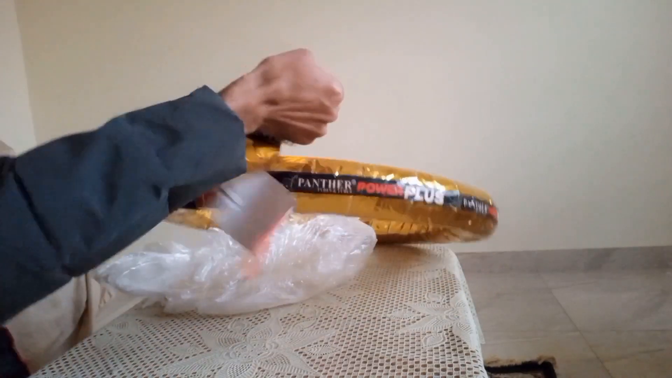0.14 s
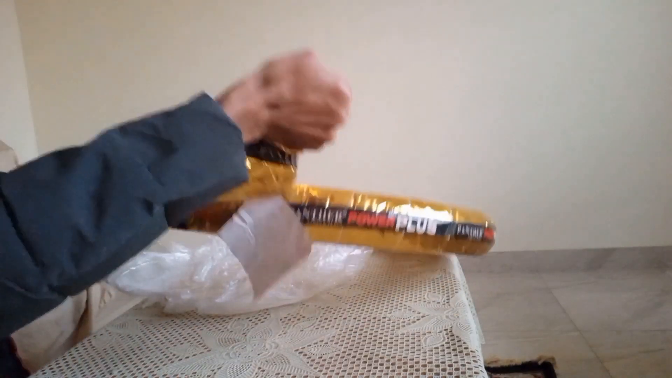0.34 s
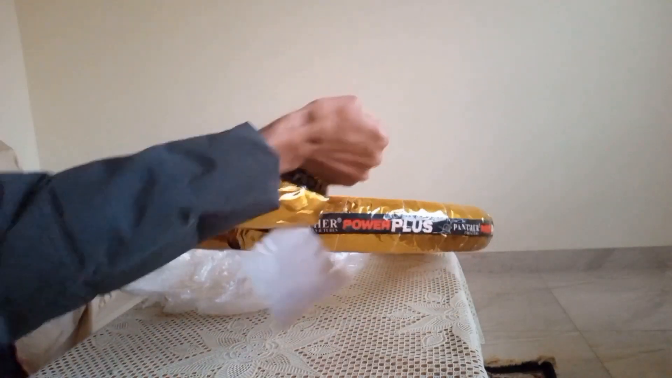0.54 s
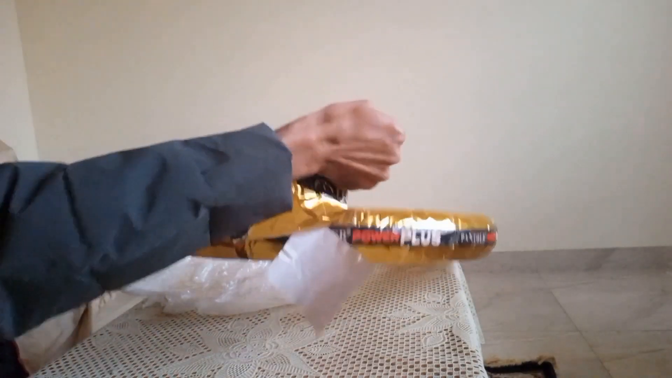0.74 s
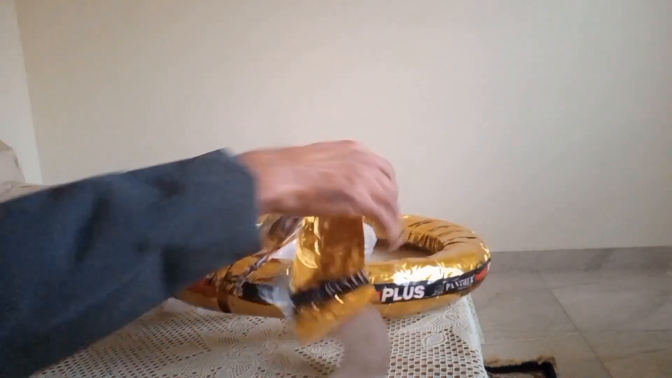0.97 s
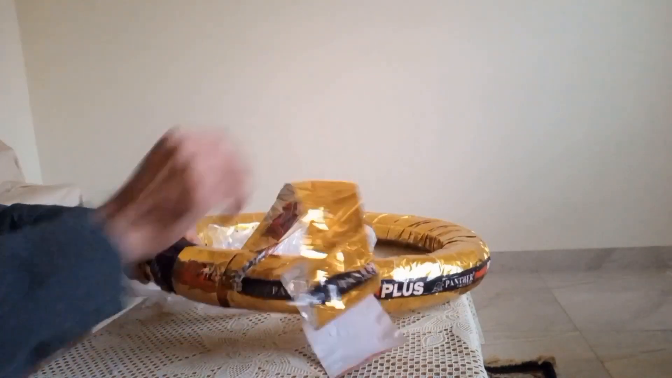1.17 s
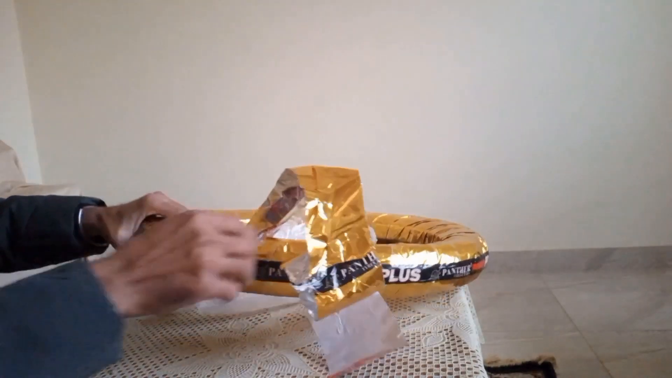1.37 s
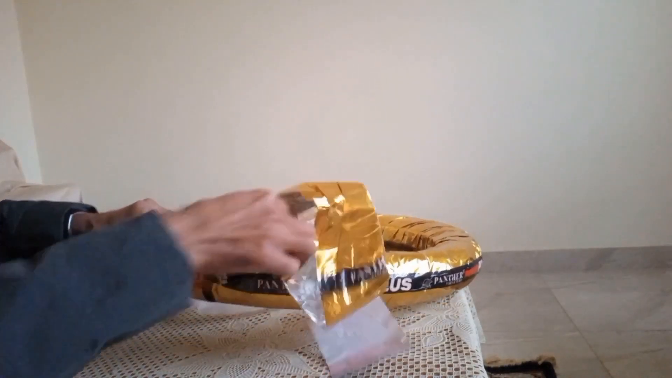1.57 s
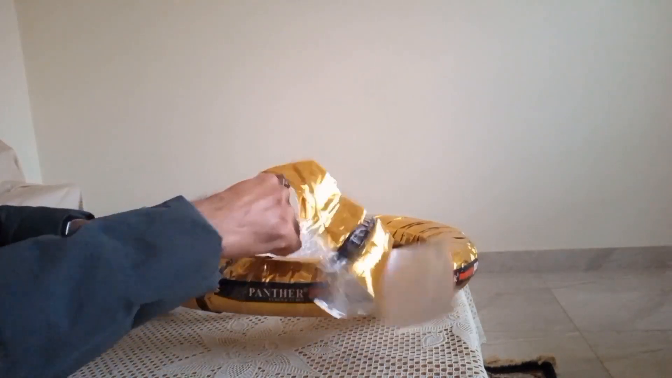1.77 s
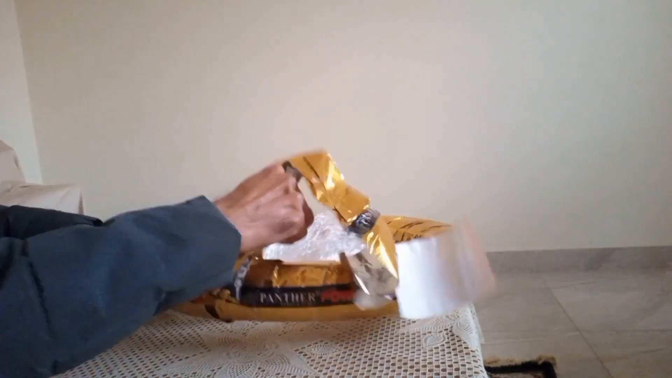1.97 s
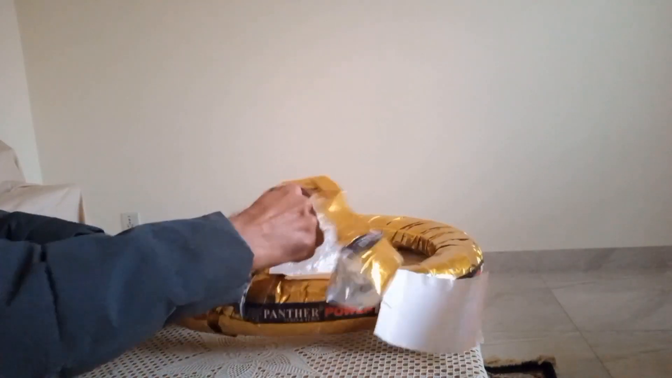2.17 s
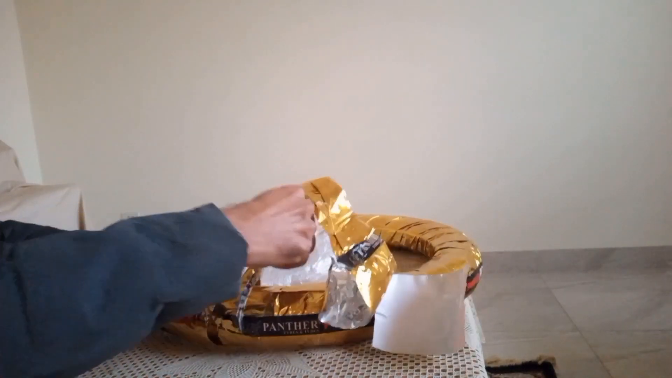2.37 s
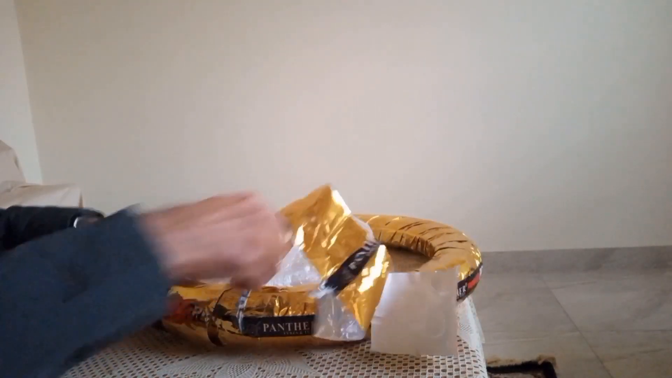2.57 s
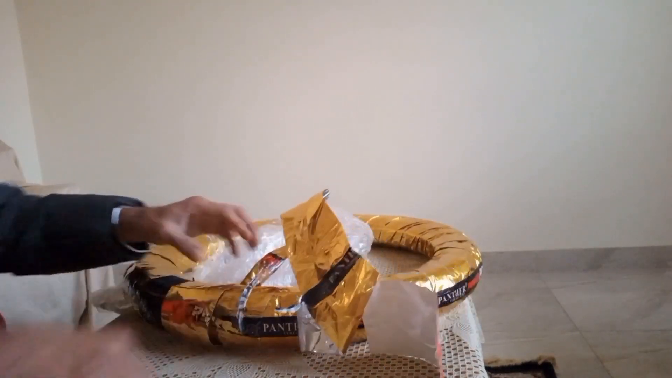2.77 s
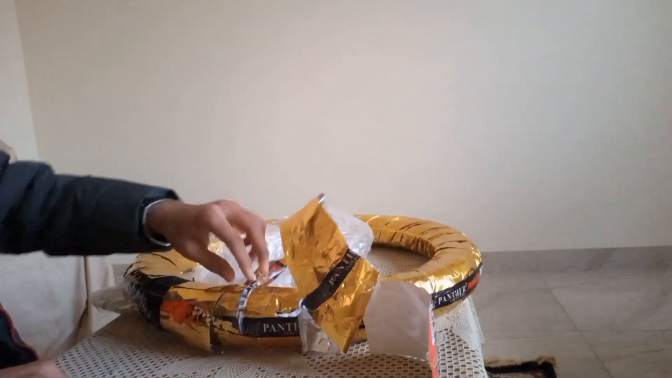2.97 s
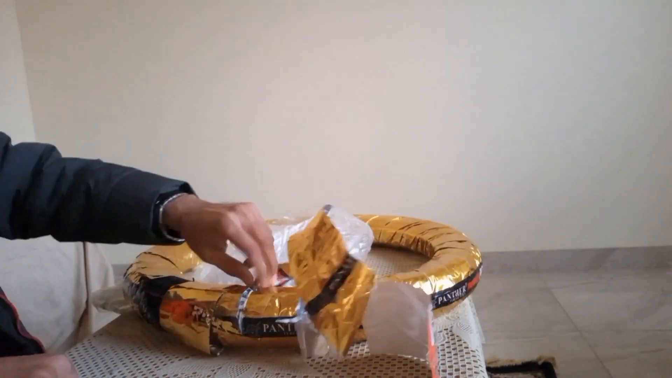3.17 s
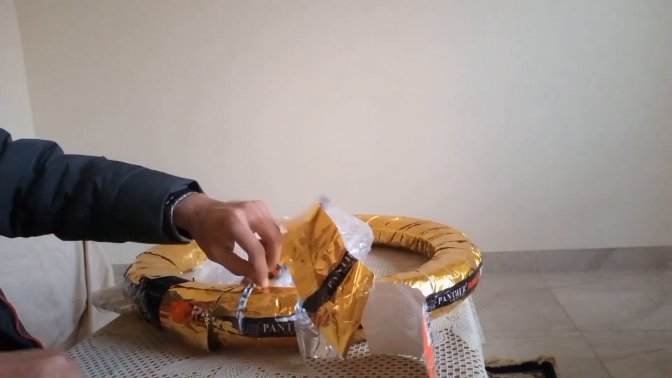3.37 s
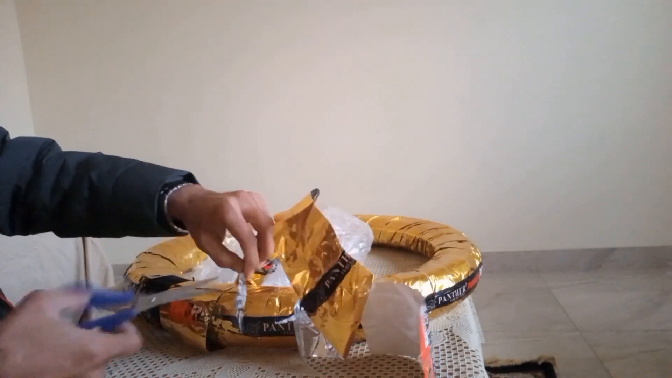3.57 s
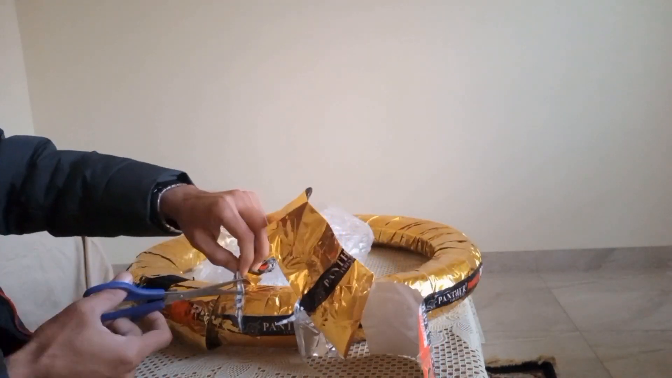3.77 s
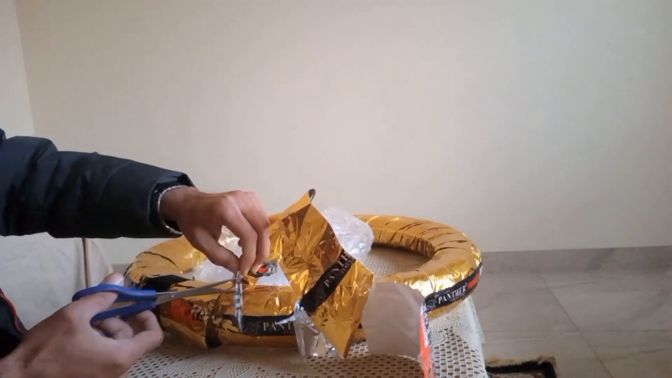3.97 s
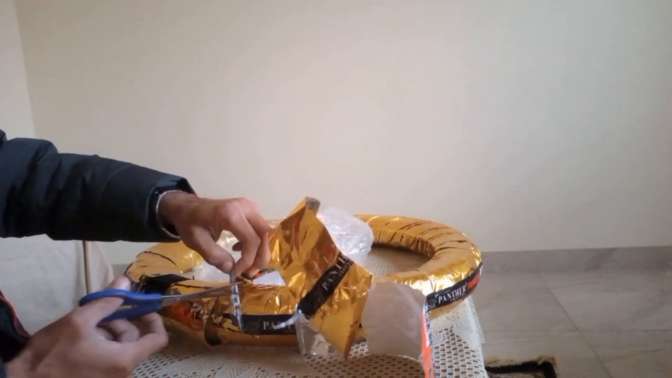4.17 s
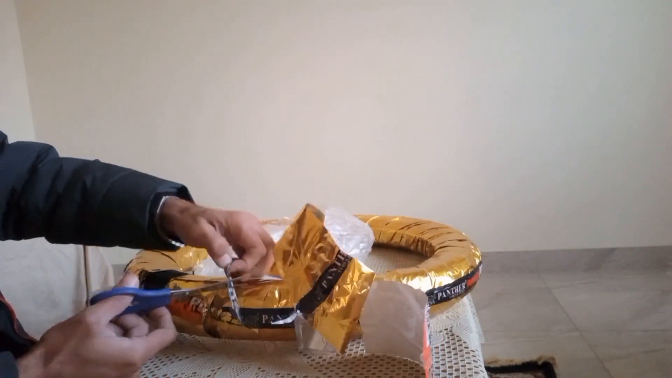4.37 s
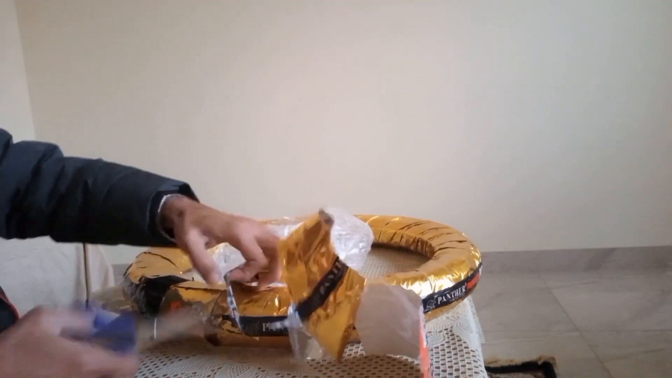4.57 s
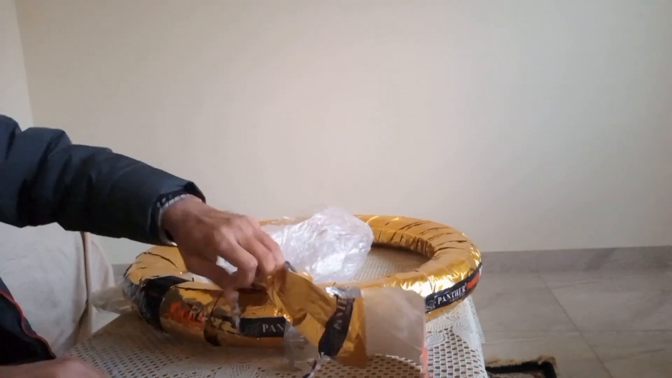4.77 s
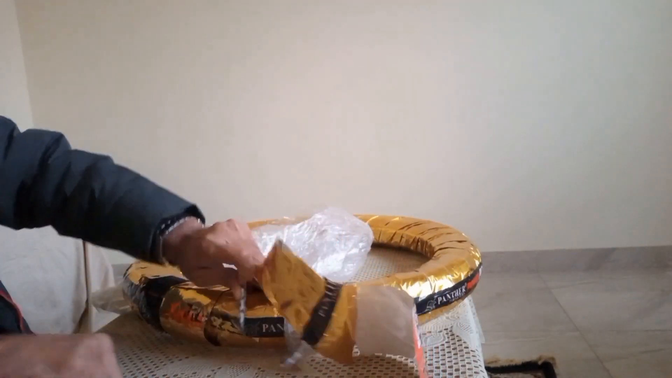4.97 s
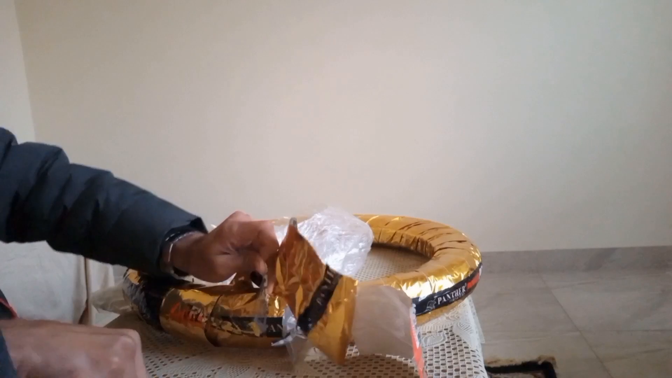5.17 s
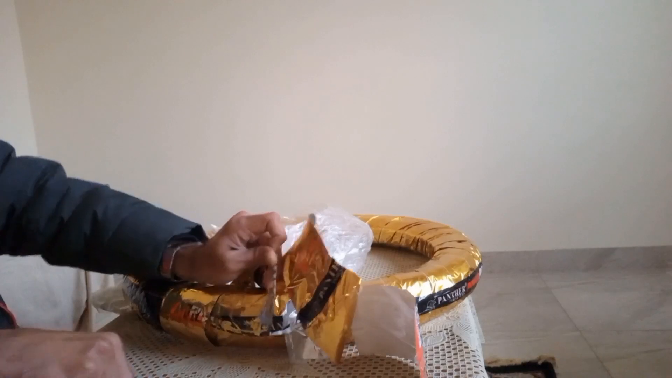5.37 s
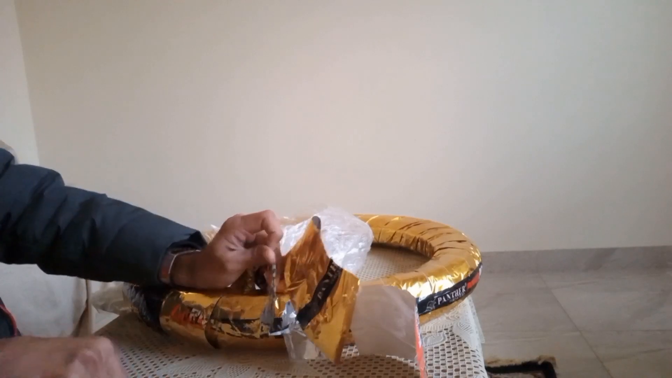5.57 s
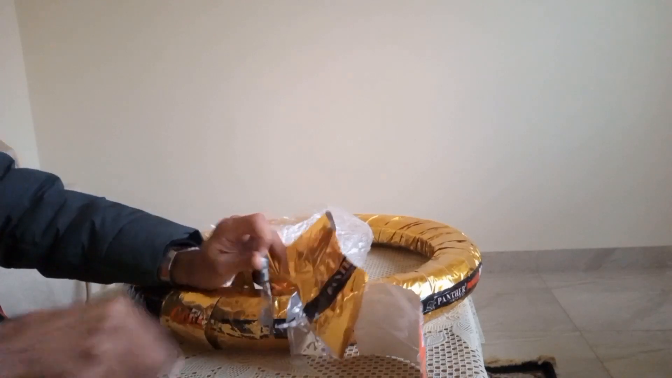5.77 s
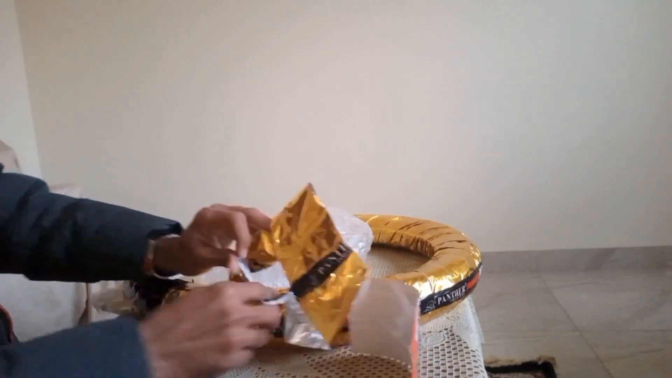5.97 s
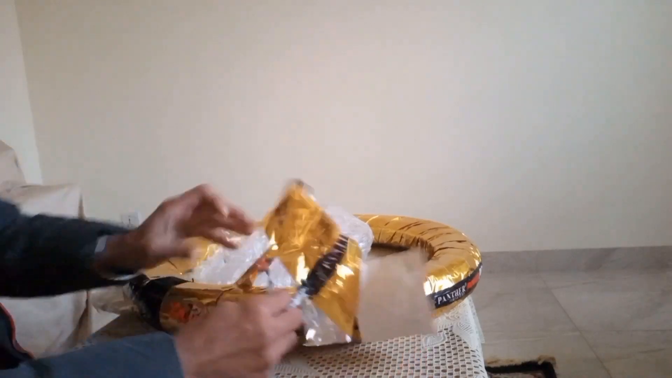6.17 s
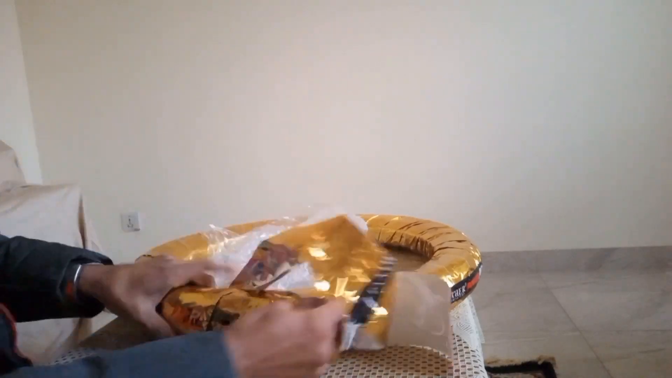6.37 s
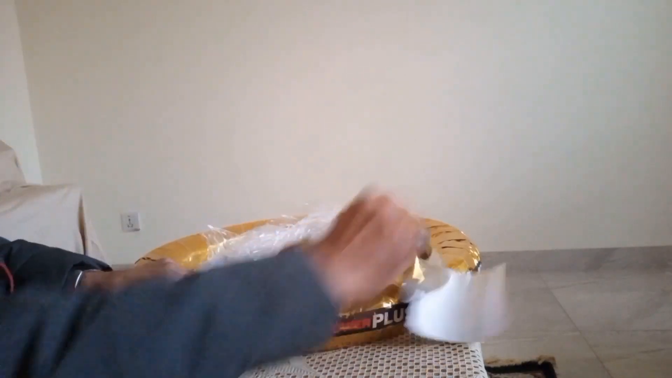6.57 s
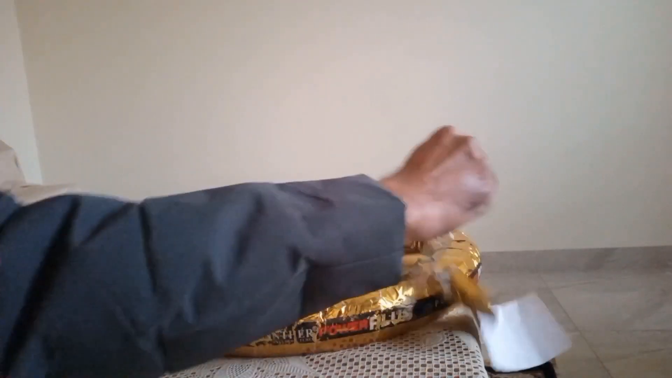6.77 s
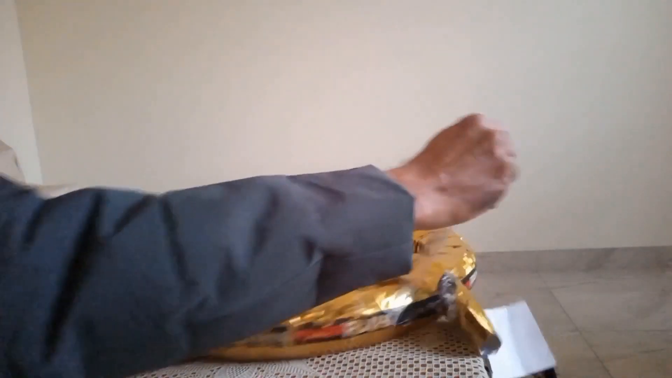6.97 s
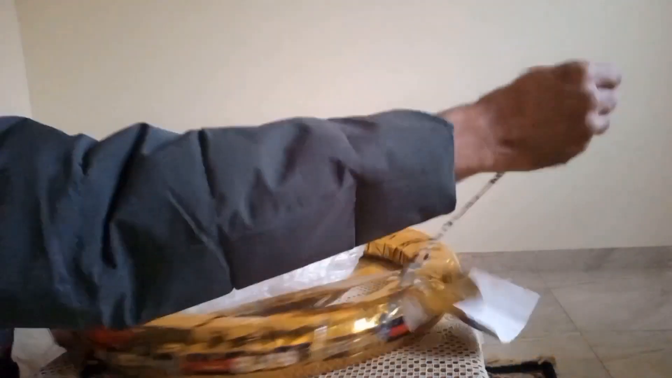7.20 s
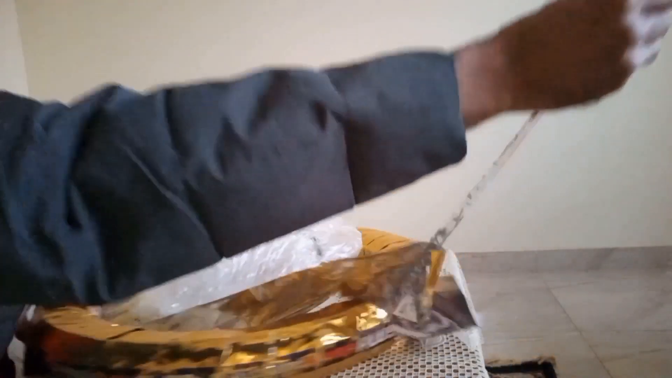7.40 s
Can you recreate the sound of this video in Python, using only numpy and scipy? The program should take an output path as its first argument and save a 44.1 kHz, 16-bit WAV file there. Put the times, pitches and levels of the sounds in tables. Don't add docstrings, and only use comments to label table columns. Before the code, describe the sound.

Metallic foil and plastic film crackle and snap off a tyre, quieting to small ticks, then ripping loudly in a bare tiled room.

```python
import sys
import numpy as np
from scipy import signal
from scipy.fft import rfft, irfft
from scipy.io import wavfile
from scipy.ndimage import uniform_filter1d

SR = 44100
rng = np.random.default_rng(int(sys.argv[2]) if len(sys.argv) > 2 else 0)


def wav_out(sig):
    wavfile.write(sys.argv[1], SR, np.round(np.clip(np.atleast_2d(sig).T, -1, 1) * 32767).astype(np.int16))


def ratio_of_db(decibels):
    return 10 ** (np.asarray(decibels, float) / 20)


N = 328104

# t/s, effort/dB, bright film share/dB, hollow tyre share/dB,
# tightness of the foil/dB
RUSTLE = [(0, -43, 1.5, -7, 4.5), (.3, -45, 0, 7, -0.5), (.7, -57, 1.5, -6, 1.5),
          (1.15, -48.5, 0.5, 5, 0.5), (1.46, -69.5, 1.5, -9, 6), (1.75, -51, -2.5, 2.5, -0.5),
          (2.3, -53.5, 0, 0.5, 0.5), (2.73, -72.5, -1.5, -0.5, 1.5), (3.0, -67, 1, 8.5, 3),
          (3.4, -70.5, 6, -3, 5), (3.75, -63, -2, 4, -3.5), (4.22, -83, -9, 2.5, 2.5),
          (4.33, -49, -4.5, 4, -2), (5.1, -53, 6, 8, 4), (5.6, -56, -1, -3, 2), (6.4, -53, -1.5, 6, 0),
          (6.75, -60, 7.5, -11.5, 4), (7.44, -40.5, 1, 7.5, 0.5)]
# t/s, length/s, effort/dB, thinness of the strip/dB
FOIL_RIPS = [
    (2.011, .14, -32, 0.7),
    (6.57, 0.015, -31, 1),
    (6.619, 0.081, -27.5, -5.5),
    (6.715, 0.055, -28, 2),
    (7.092, .13, -31, 1),
    (7.393, 0.046, -30.5, 4),
]


def crumpling():
    t = np.arange(N) / SR
    effort_db = effort(t)
    s, _, *shares = np.transpose(RUSTLE)
    bright_db, hollow_db, tight_db = (np.interp(t, s, share) for share in shares)
    thin_db = sum(db * ((t > s) & (t < s + length)) for s, length, _, db in FOIL_RIPS)
    bright_db = bright_db + thin_db
    hollow_db = hollow_db - 1.9 * thin_db

    coarse = creases(effort_db, per_s=1200, spread_db=3.5) * ratio_of_db(effort_db)
    fine = creases(effort_db, per_s=3500, spread_db=0) * ratio_of_db(effort_db) + coarse / 2
    slack = crackle(coarse * ratio_of_db(-4 - tight_db - thin_db), 1164, 2260, cycles=1.43)
    taut = crackle(fine * ratio_of_db(-7 + tight_db), 3020, 6270, cycles=2.14)
    film = crackle(fine * ratio_of_db(bright_db), 8260, 15600, cycles=0.97)
    tyre = crackle(coarse * ratio_of_db(hollow_db - 6), 266.6, 932, cycles=1.8)
    low_cut = signal.butter(2, 190, 'high', fs=SR, output='sos')
    return signal.sosfilt(low_cut, slack + taut + film + tyre)


def effort(t):
    # t/s, effort/dB, rise/s, fall/s
    grips = [(0, -25.5, .01, 0.11), (.192, -36.5, 0.15, 0.058), (.35, -29.5, 0.01, 0.13),
             (0.599, -43, 0.16, 0.17), (.771, -44, 0.07, 0.091), (1.055, -40, 0.15, 0.031),
             (1.74, -45, 0.15, 0.68), (1.905, -37, 0.031, 0.047), (2.16, -36.5, .02, 0.13),
             (2.4, -45, 0.05, 0.25), (2.506, -46, 0.16, 0.14), (3.07, -55.5, 0.01, 0.15),
             (3.335, -55, 0.03, 0.53), (3.578, -48.5, 0.011, 0.57), (4.752, -42, 0.14, 0.26),
             (5.175, -29.5, 0.0085, 0.039), (5.272, -38.5, 0.084, 0.057), (5.415, -42.5, 0.029, 0.33),
             (5.83, -41, 0.027, 0.037), (5.951, -45.5, 0.17, 0.021), (6.149, -49.5, 0.14, 0.093),
             (6.266, -38.5, 0.055, 0.026), (6.363, -43.5, 0.017, 0.2), (6.493, -35.5, 0.097, 0.035),
             (7.148, -27, 0.022, 0.021), (7.237, -30.5, .012, 0.019), (7.257, -28, 0.02, 0.055),
             (4.09, -60, 0.097, .02), (3.19, -57, 0.062, .03), (5.92, -47, 0.034, 0.026)]
    grip_range_db = 14
    rip_edge_db_per_s = 3000
    u = t[::32]
    parts = [np.interp(u, *np.transpose(RUSTLE)[:2])]
    for s, db, rise, fall in grips:
        parts.append(db - grip_range_db * np.maximum((s - u) / rise, (u - s) / fall))
    for s, length, db, _ in FOIL_RIPS:
        outside = np.maximum(np.maximum(s - u, u - s - length), 0)
        parts.append(db - rip_edge_db_per_s * outside)
    return np.interp(t, u, 10 * np.log10(sum(10 ** (p / 10) for p in parts)))


def creases(effort_db, per_s, spread_db):
    busy = np.clip(per_s * ratio_of_db(.55 * (effort_db + 40)), 120, 20000) / SR
    clump_db = 4 - 0.096 * np.maximum(effort_db + 49, 0)
    clump = ratio_of_db(clump_db * evened(uniform_filter1d(rng.standard_normal(N), 260)))
    spread = ratio_of_db(spread_db * np.minimum(rng.exponential(1, N), 3))
    size = clump * spread * (rng.random(N) < busy) / np.sqrt(busy)
    sign = rng.choice([-1., 1.], N)
    return size * sign / (uniform_filter1d(size ** 2, SR // 5) + 1e-3) ** .5


def crackle(clicks, lo_hz, hi_hz, cycles):
    count, out = 7, np.zeros((2, N))
    fold = evened(uniform_filter1d(rng.standard_normal(N), 900))
    which = (count * rng.random(N) / 2 + count * fold / 2).astype(int) % count
    for k, hz in enumerate(np.geomspace(lo_hz, hi_hz, count)):
        u = np.arange(round(4 * cycles * SR / hz) + 8) * hz / SR / cycles
        grain = np.pad(u * np.exp(-3 * u) * np.sin(2 * np.pi * cycles * u), (0, 8))
        pair = ports(grain / np.linalg.norm(grain), rng.integers(0, 5), rng.standard_normal(30))
        out += signal.oaconvolve((clicks * (which == k))[None], pair, axes=1)[:, :N]
    return out


def snaps():
    # t/s, peak
    # level/dB, ring f/Hz, treble against the ring/dB
    creasing = [(0.052, -11.5, 5800, -13), (0.1966, -13, 5000, -19.5), (0.3408, -22, 3070, -21),
                (0.3489, -13, 3260, -14), (0.3752, -13.5, 3280, -18), (0.4731, -28.5, 1890, -30),
                (0.572, -22.5, 4170, -2), (0.749, -18.5, 5740, -4), (0.9053, -28.5, 2540, -7),
                (1.1332, -25.5, 2750, -18), (1.2989, -34, 1330, -12), (1.412, -33, 2330, -39),
                (1.6297, -41, 2920, -20), (1.7372, -22, 2370, -21.5), (1.7902, -22.5, 4020, -10),
                (1.8611, -29, 2425, -26), (1.9104, -23, 3300, -26), (1.9192, -16, 4500, -11),
                (1.9312, -18.5, 1230, -21), (2.0057, -12.5, 2260, -12), (2.012, -20, 3020, -15),
                (2.1165, -11, 3280, -14), (2.3865, -30, 1750, -9), (2.5064, -27, 1560, -12),
                (2.595, -26.5, 3480, -21), (2.6071, -20, 3470, -5.5),
                (3.066, -39, 4300, -8), (3.135, -26.5, 5600, -14), (3.1907, -30, 5870, -10),
                (3.2928, -33, 3200, -6), (3.3398, -32.5, 6910, -8), (3.414, -34, 3100, -5),
                (3.4787, -21.5, 5700, -9), (3.5317, -29, 5730, -17), (3.5644, -28.5, 2850, -21),
                (3.575, -27, 1820, -15), (3.5846, -22, 5100, -13), (3.6177, -22, 3500, -8),
                (3.643, -18.5, 4900, 6), (3.7382, -29, 5600, -11), (3.7615, -25, 1590, -13),
                (4.007, -27, 4400, -9), (4.0973, -40.5, 4450, -14), (4.2497, -21, 4600, -11),
                (4.3225, -25.5, 2900, -16.5), (4.3436, -24, 6460, -17), (4.3865, -23, 4000, -16),
                (4.408, -24.5, 3870, -4), (4.4432, -26, 1170, -8), (4.4528, -27, 3500, -17),
                (4.5289, -25, 5090, -13), (4.5766, -22, 4600, -10), (4.6273, -23.5, 3500, -24)]
    picking = [(4.6985, -28, 3410, -7), (4.72, -16.5, 3670, -18), (4.7438, -18.5, 3390, -9),
               (4.853, -24, 3270, -15), (4.9428, -22, 3220, -2), (5.0112, -22, 3350, -5),
               (5.1751, -5.5, 1230, -2), (5.1872, -17.5, 1280, -7), (5.2038, -15.5, 3570, -11),
               (5.2096, -10, 1270, 1), (5.2455, -14, 1180, 1), (5.4761, -24, 3360, -12),
               (5.742, -23.5, 3350, -3), (5.812, -30, 4660, 3), (5.8235, -27, 3400, -20),
               (5.8322, -28, 3160, -8), (5.8797, -26, 5390, -1), (5.894, -27.5, 3500, -14),
               (5.95, -25, 1480, 2), (5.9564, -32, 3210, -10), (6.0353, -24, 3100, -27),
               (6.1355, -28, 5180, -8), (6.1585, -23, 6000, -8), (6.163, -27, 6100, -12)]
    tearing = [(6.417, -16, 4460, -10), (6.4898, -13, 1600, -8), (6.6169, -5, 2860, -10),
               (6.6293, -8, 2760, -6), (6.6356, -10, 3550, -13), (6.6424, -14, 4760, -23),
               (6.7659, -5.5, 5500, -15), (6.9986, -31.5, 6250, 3), (7.4054, -21, 4600, -18)]
    crunches = [(1.0442, -30, 2870, -13), (1.142, -28, 4460, 4), (2.022, -18.5, 2900, -21),
                (2.1297, -12.5, 3120, -12.5), (2.1446, -16.5, 3630, -4), (3.101, -39, 6870, -20),
                (3.7099, -20, 4860, -10), (3.8155, -31.5, 3070, -14), (3.832, -34.5, 5910, -8),
                (4.331, -37, 5180, -19), (4.831, -26.5, 1440, -14), (5.7062, -29, 5600, -13),
                (6.2737, -20, 6340, -9.5), (6.482, -13, 6660, -3), (6.5007, -12.5, 1450, -6),
                (7.0974, -19, 4800, -3), (7.352, -13, 1960, 0)]
    # t/s, peak level/dB,
    # ring f/Hz, treble against the ring/dB, length/ms
    folds = [(.0125, -7, 4800, -15, 2.2), (0.0149, -4.5, 5040, -11, 2.2), (0.019, -11, 4500, -12, 2),
             (.028, -11, 4160, -15, 3), (.083, -15.5, 5000, -12, 4), (0.3564, -6.5, 3200, -18, 3.5),
             (.361, -9, 2200, -17, 3.5), (0.7498, -25, 1050, -3, 3.5), (1.837, -31, 2500, -20, 2.5),
             (1.845, -19.5, 2560, -15, 2.8), (2.04, -19.5, 1090, -17, 4.5), (4.2677, -41, 3490, -16, 4),
             (4.2921, -38, 3100, -11, 4), (4.3635, -27, 1700, -11, 2.4), (4.4893, -36, 4200, -17, 2.5),
             (4.5974, -33, 3720, -13, 2.5), (4.6693, -29, 3130, -14, 2.2), (4.682, -33, 3300, -14, 2.5),
             (4.8222, -30, 3100, -14, 2.5), (4.9928, -28, 4640, -12, 2.2), (5.119, -17, 3360, -13, 1.9),
             (5.638, -19, 7000, -2, .8), (5.8681, -31, 3340, -5, 2.5), (5.917, -30, 4580, -14, 2.48),
             (6.0547, -36, 4870, -10, 4.5), (6.115, -31, 7410, -13, 4.6), (6.1272, -28, 2910, -10, 2.5),
             (6.213, -30, 3150, -13, 2.8), (6.247, -26.5, 4310, -10, 6), (6.27, -21, 5500, -12, 1.3),
             (6.289, -29, 7160, -14, 2.5), (6.408, -26, 2800, -18, 2), (3.593, -27, 1200, -12, 3),
             (3.64, -26, 900, -12, 3), (5.477, -24, 1250, -20, 3),
             (6.558, -5.5, 3420, -11, 1.6), (6.56, -9, 3300, -13, 2.2), (6.5684, -8.5, 3180, -6, 2.1),
              (6.5714, -8, 3300, -4, 3.1), (6.6453, -11, 4760, -10, 2.2), (6.7144, -17, 5500, -9, 5),
              (6.7275, -10, 6170, -12, 2.8), (6.733, -7, 5440, -11, 1.1), (7.1462, -13, 1790, -15, 3.4),
              (7.235, -15, 7390, -11, 5.9), (7.2553, -14.5, 9000, -7, 2.5), (7.2977, -13, 990, -7, 3),
              (7.3122, -12, 7170, -8, 2.8), (7.36, -19, 1700, -6, 2.5), (7.3953, -17, 5780, -10, 5.6),
              (7.4234, -14, 4570, -8, 2.1), (6.4835, -12, 3000, -8, 2), (7.272, -16, 900, -12, 4),
              (7.205, -16, 2000, -10, 5)]
    # events, length/ms, ring bandwidth as a share of its f
    kinds = [(creasing, 2, .7), (picking, 2, .37), (tearing, .48, .7), (crunches, 9.3, .7)]
    rows = [(*row, ms, wide) for table, ms, wide in kinds for row in table]
    rows += [(*row, .57) for row in folds]

    out, sent, t = np.zeros((2, N)), np.zeros(N), np.arange(-150, 650) / SR
    late = .0008
    swell = np.exp(np.minimum(t - .0004, 0) / .0004) + .1 * np.exp(np.minimum(t, 0) / .0015)
    click = (np.arange(800) == 150) * 1.
    flip = 2.7 * np.roll(click, 18)
    for s, db, hz, bright_db, ms, wide in rows:
        shape = swell * np.exp(-(np.maximum(t, 0) / (0.00088 * ms)) ** 2)
        low, high = (rng.standard_normal((2, 800)) + flip) * shape
        snap = crease_modes(low, high, hz, wide * hz, bright_db)
        snap = snap + 0.093 * np.roll(snap, round(0.0026 * SR))
        lag = int(np.clip(2 + 1.6 * rng.standard_normal(), 0, 5))
        pair = ports(snap, lag, rng.standard_normal(30))
        gain = ratio_of_db(db + 1) / abs(pair.mean(0)).max()
        add(out, s + late + t[0], gain * pair)
        add(sent, s + late + t[0], gain * crease_modes(click, click, hz, wide * hz, bright_db))
    return out, sent


def crease_modes(low, high, hz, width, bright_db):
    ring = evened(np.gradient(resonate_twice(low, hz, width, hz, width)))
    body = evened(resonate_twice(low, 850, 1100, 920, 1100))
    edge = evened(resonate_twice(high, 10700, 10500, 11400, 10900))
    return ring + (800 / hz) ** 1.2 * body + ratio_of_db(bright_db + 15) * edge


def tape():
    # t/s, length/s, slips per s at start, at end, level/dB
    pulls = [
        (5.397, 0.063, 820, 850, -31.5),
        (5.464, 0.052, 980, 1430, -28.5),
        (5.517, 0.069, 430, 197, -34),
        (5.575, .017, 220, 500, -31.5),
        (5.593, .04, 800, 1080, -28),
    ]
    # f/Hz, bandwidth/Hz, level/dB
    strip_modes = [(3240, 2900, 4.5), (7640, 1170, 14.5), (9500, 2830, 15.5), (13600, 4200, 13.5)]
    edge_db_per_s, slack_db = 1400, -43
    starts, lengths, first, last, _ = np.transpose(pulls)
    t = np.arange(starts[0] - .005, starts[-1] + lengths[-1] + 0.0022, 1 / SR)
    rate = np.interp(t, np.c_[starts, starts + lengths].ravel(), np.c_[first, last].ravel())
    levels = []
    for s, length, _, _, level_db in pulls:
        outside = np.maximum(abs(t - s - length / 2) - length / 3, 0)
        levels.append(level_db - edge_db_per_s * outside)
    db = np.maximum(np.max(levels, 0), slack_db)
    uneven = np.interp(t, [5.46, 5.48, 5.51, 5.52, 5.59, 5.6], [1.2, .3, .3, .04, .04, .3])
    jitter = 1 + uneven * evened(uniform_filter1d(rng.standard_normal(len(t)), 40))
    slips = np.diff(np.floor(np.cumsum(rate * abs(jitter)) / SR), prepend=0)
    slips = slips * ratio_of_db((-2 + 2 * uneven) * rng.standard_normal(len(t))) / np.sqrt(rate)
    modes = [(-1) ** k * ratio_of_db(g) * resonate(slips, f, w) for k, (f, w, g) in enumerate(strip_modes)]
    out = np.zeros((2, N))
    add(out, t[0], ports(evened(sum(modes)) * ratio_of_db(db), 0, rng.standard_normal(30)))
    return out


def thuds():
    # t/s, peak level/dB, f/Hz, decay/s
    knocks = [(0.35, -41, 550, 0.082), (1.904, -42.5, 550, 0.019), (2.92, -51, 270, 0.06),
              (2.905, -51, 680, 0.023), (0.038, -45.5, 314, 0.22), (1.298, -54, 500, 0.0095),
              (1.55, -58, 274, .06), (4.624, -45.5, 296, 0.025), (4.759, -42, 540, 0.024),
              (5.013, -48.5, 533, 0.02), (5.28, -44, 250, 0.08), (5.5, -55, 260, 0.072),
              (5.823, -46, 587, .03), (5.942, -46.5, 530, 0.025), (6.366, -45, 460, 0.01),
              (6.635, -34, 760, 0.017), (6.675, -34.5, 690, 0.022), (7.11, -38, 720, .04),
              (7.29, -35, 870, .015), (4.705, -53, 282, 0.029), (5.18, -35.5, 276, 0.048),
              (6.553, -32, 550, 0.018), (6.722, -53, 55, 0.035), (7.085, -41.5, 490, 0.02),
              (7.245, -36, 503, 0.037), (7.2, -51, 66, 0.08), (5.4, -50, 130, 0.067), (4.9, -53, 170, .15),
              (3.2, -59, 120, 0.13), (5.55, -66, 70, .1), (4.44, -58, 115, 0.037), (7.349, -34, 200, 0.014)]
    out, t = np.zeros((2, N)), np.arange(8000) / SR
    for s, db, hz, decay in knocks:
        push = rng.standard_normal(8000) * np.minimum(t / 0.01, 1) * np.exp(-t / decay) * (1 - t / t[-1])
        knock = resonate(push, hz, 0.28 * hz) + 0.055 * resonate(push, 2 * hz, hz)
        tilt_db = np.array([[1], [-1]]) * 350 / hz
        add(out, s, ratio_of_db(db + 13 + tilt_db) * knock / abs(knock).max())
    return out


def room(x):
    # f/Hz, t60/s
    walls = [(60, 0.24), (200, 0.7), (600, 0.64), (1500, 0.68), (4000, 0.42), (10000, 0.28), (16000, 0.36)]
    hz, t, z = signal.stft(rng.standard_normal((2, SR)), SR, nperseg=256)
    decay = ratio_of_db(-60 * t / read(walls, hz)[:, None])
    tail = signal.istft(diffuse(z) * decay, SR, nperseg=256)[1]
    tail *= np.clip((np.arange(tail.shape[1]) / SR - .005) / .012, 0, 1)
    return signal.fftconvolve(x[None], tail / np.linalg.norm(tail[0]), axes=1)[:, :N]


def background():
    # f/Hz, level per Hz/dB
    hiss_spectrum = [(24, -33), (40, -12), (106, 3), (171, 1), (345, -65), (433, -35), (873, -53),
                     (13100, -41), (16000, -36)]
    # t/s, level/dB
    hum_level = [(0.0, -50), (0.1, -61), (0.43, -60), (0.91, -73), (1.1, -65), (1.35, -77), (2.24, -60),
                 (2.9, -74), (2.92, -66.5), (4.02, -60), (4.18, -72), (5.04, -56.5), (6.22, -70.5),
                 (6.78, -45), (6.84, -72), (7.04, -76), (7.17, -53), (7.44, -53)]
    hiss_db = -63
    frames, hz = N // 256 + 5, np.fft.rfftfreq(1024, 1 / SR)
    a, b = rng.standard_normal((2, 2, 513, frames))
    z = diffuse(a + 1j * b) * ratio_of_db(np.minimum(read(hiss_spectrum, hz), -20))[:, None]
    hiss = ratio_of_db(hiss_db) * evened(signal.istft(z, nperseg=1024, noverlap=768)[1][:, :N])
    noise = rng.standard_normal((3, N))
    common = evened(resonate_twice(noise[0], 114.4, 13, 115, 13))
    separate = evened(resonate_twice(noise[1:], 86, 30, 86, 27))
    level = ratio_of_db(np.interp(np.arange(N) / SR, *np.transpose(hum_level)) - 0.5)
    return hiss + level * (common + 0.5 * separate) * ratio_of_db([[3.5], [-3.5]])


def diffuse(z):
    # f/Hz, coherence
    likeness = [(60, 1), (180, 0.96), (550, 0.75), (1650, -1), (4970, -0.22), (15000, -0.64)]
    same = np.clip(read(likeness, np.linspace(0, SR / 2, z.shape[1])), 0, 1)[:, None]
    return np.array([z[0], same * z[0] + np.sqrt(1 - same ** 2) * z[1]])


def ports(sound, lag, noise, other=0.53):
    scatter = np.convolve(sound, noise * np.exp(-np.arange(len(noise)) / 23))[:len(sound)]
    right = sound + other * scatter * np.linalg.norm(sound) / np.linalg.norm(scatter)
    return np.array([np.roll(sound, lag), right / np.sqrt(1 + other ** 2)])


def resonate(x, hz, width):
    turn, r = np.exp(2j * np.pi * hz * np.arange(x.shape[-1]) / SR), np.exp(-np.pi * width / SR)
    return 2 * (turn * signal.lfilter([1 - r], [1, -r], x / turn)).real


def resonate_twice(x, hz, width, next_hz, next_width):
    return resonate(resonate(x, hz, width), next_hz, next_width)


def evened(x):
    return x / np.sqrt(np.mean(x ** 2) + 1e-20)


def read(points, hz):
    f, value = np.transpose(points)
    return np.interp(np.log(hz + 1), np.log(f + 1), value)


def add(mix, s, sound):
    part = mix[..., round(s * SR):][..., :sound.shape[-1]]
    part += sound[..., :part.shape[-1]]


def scene():
    near = crumpling() + tape() + thuds()
    snapped, sent = snaps()
    direct = (near + snapped) * ratio_of_db([[.6], [-.6]])
    return direct + room(ratio_of_db(-5) * near[0] + ratio_of_db(-6) * sent) + background()


def roll_off(x):
    return signal.sosfilt(signal.butter(12, 16680, fs=SR, output="sos"), x)


def record(dry):
    # f/Hz, gain/dB
    port_response = [(30, -34), (80, -4.5), (200, -7), (3300, 1.5), (7000, 2.5), (8000, -2.5), (9500, -1.5),
                     (13000, 1), (15200, 0.5), (15800, -14), (17000, -73)]
    colour = ratio_of_db(read(port_response, np.fft.rfftfreq(N, 1 / SR)))
    captured = irfft(rfft(np.tanh(dry)) * colour, N)
    return roll_off(captured)


dry = scene()
out = record(dry)
wav_out(out)
```